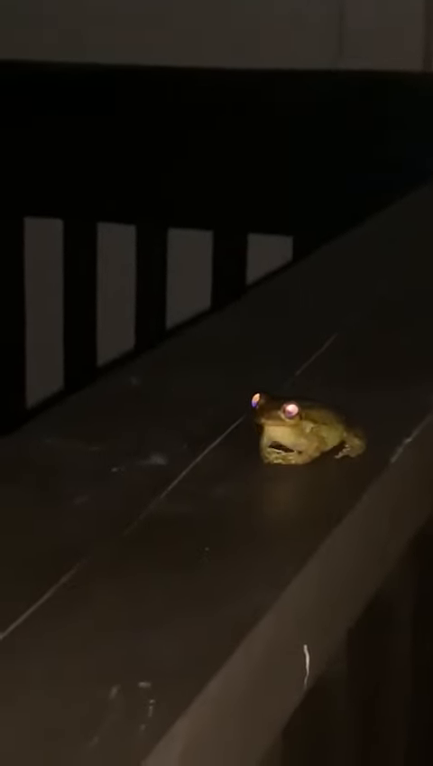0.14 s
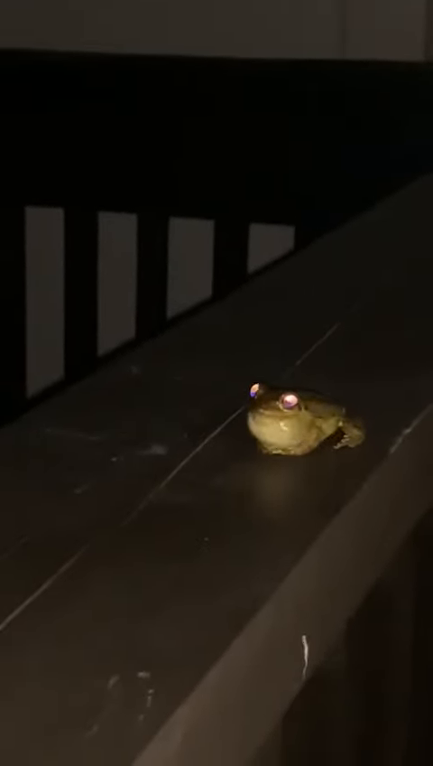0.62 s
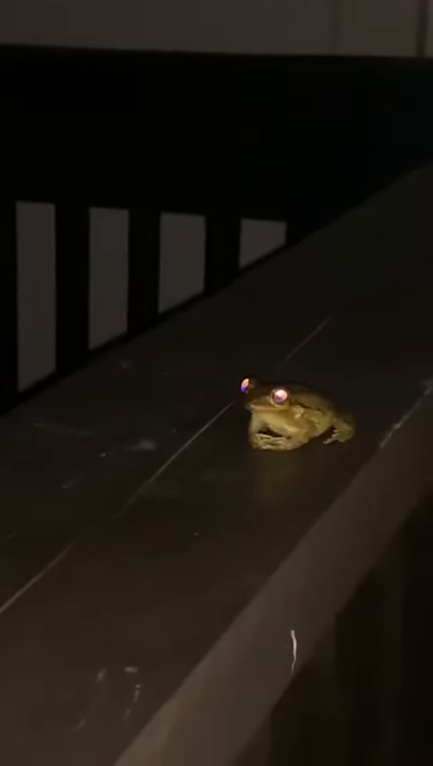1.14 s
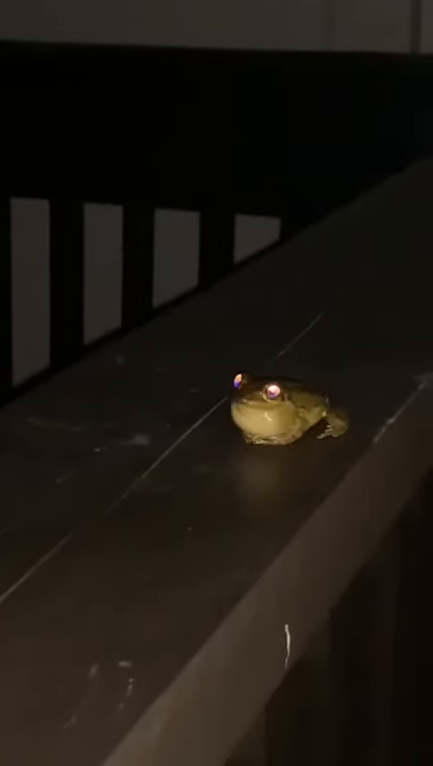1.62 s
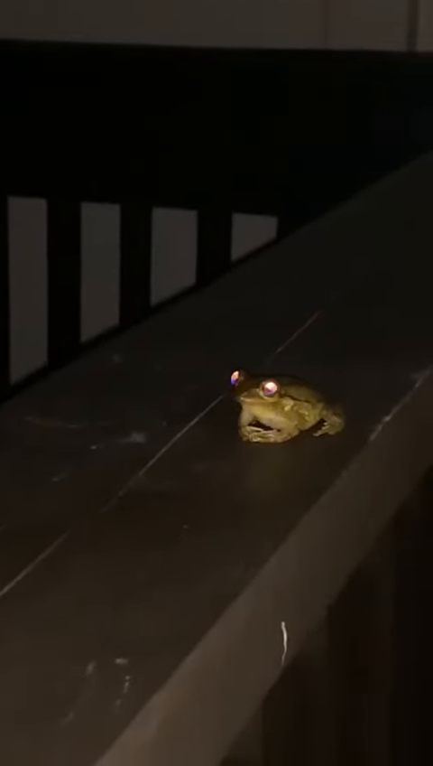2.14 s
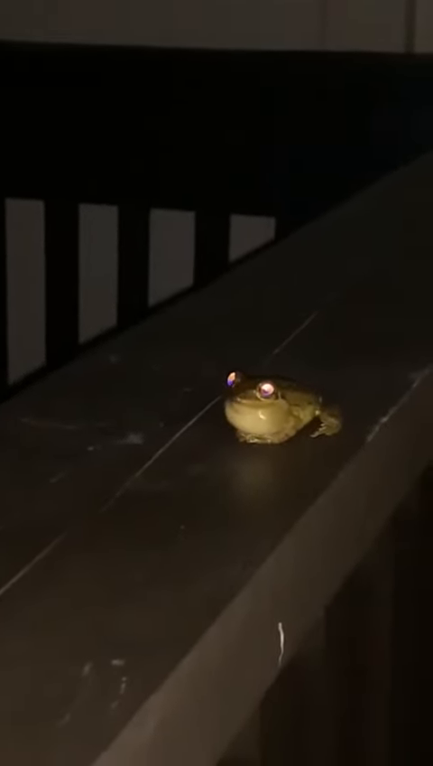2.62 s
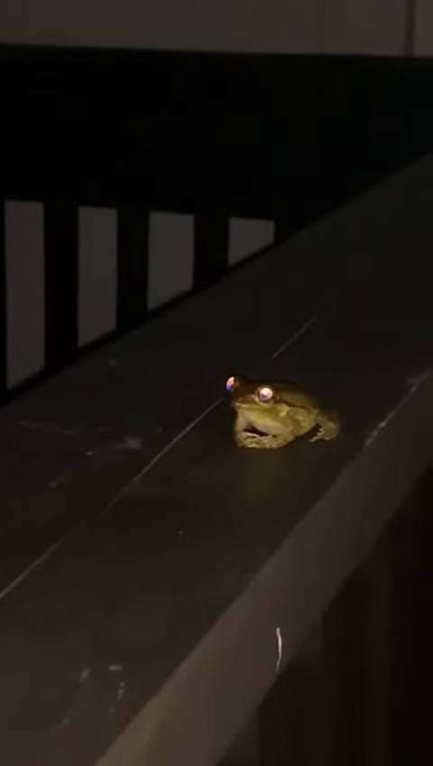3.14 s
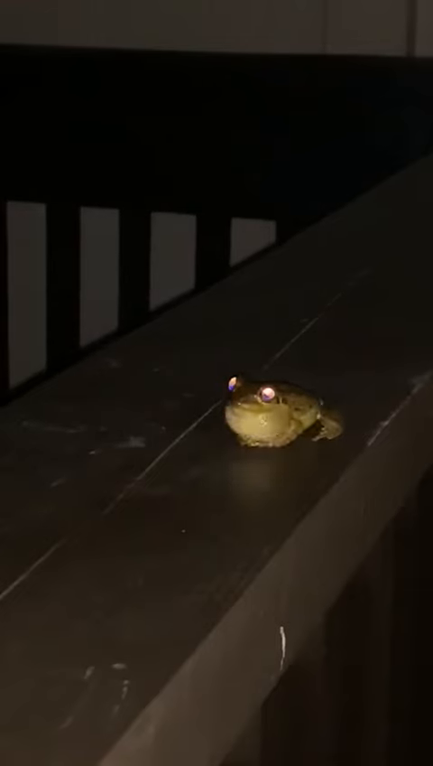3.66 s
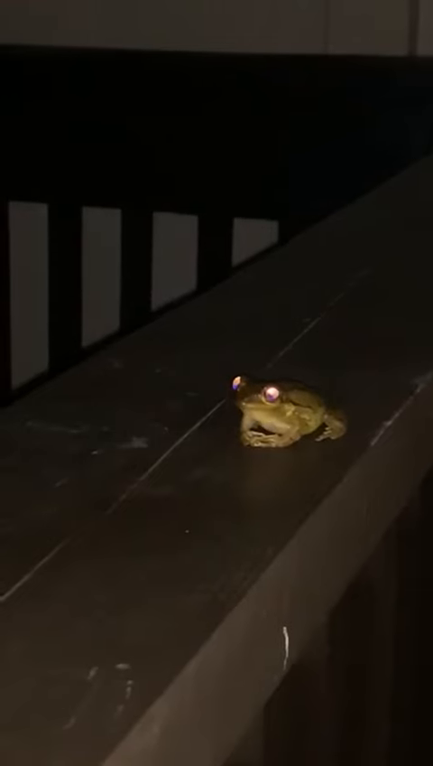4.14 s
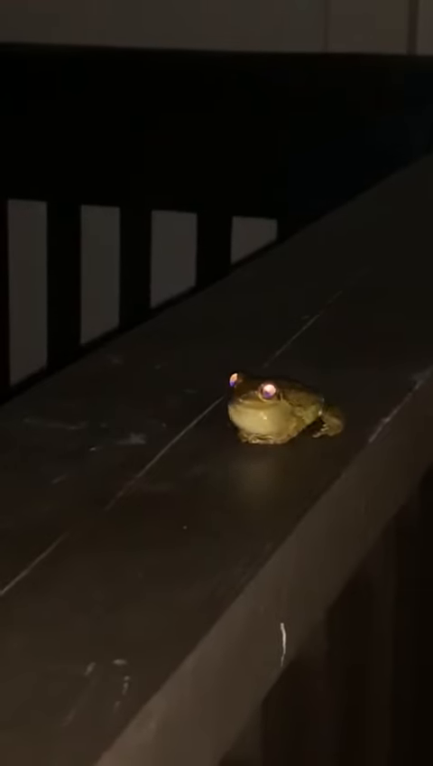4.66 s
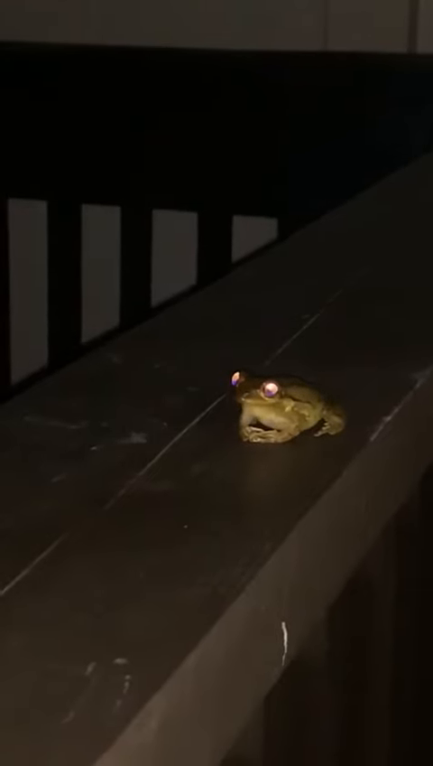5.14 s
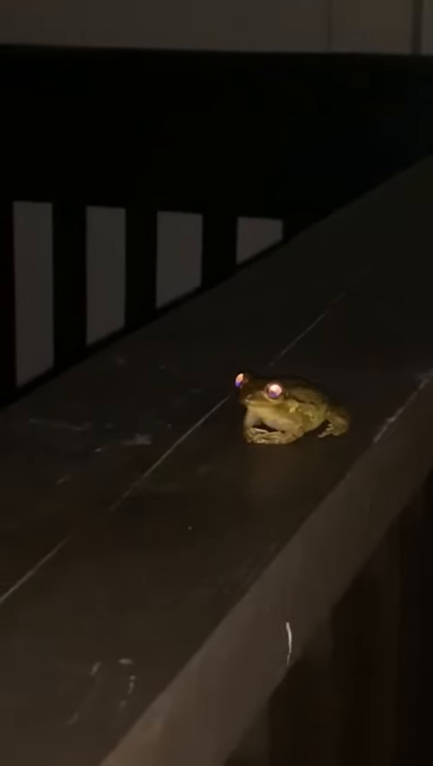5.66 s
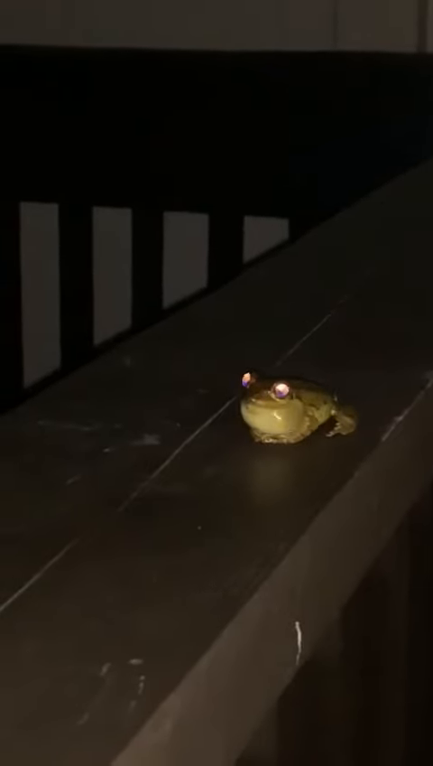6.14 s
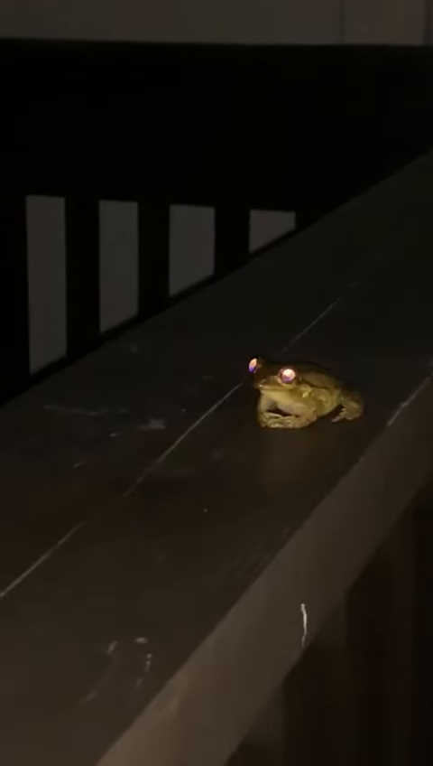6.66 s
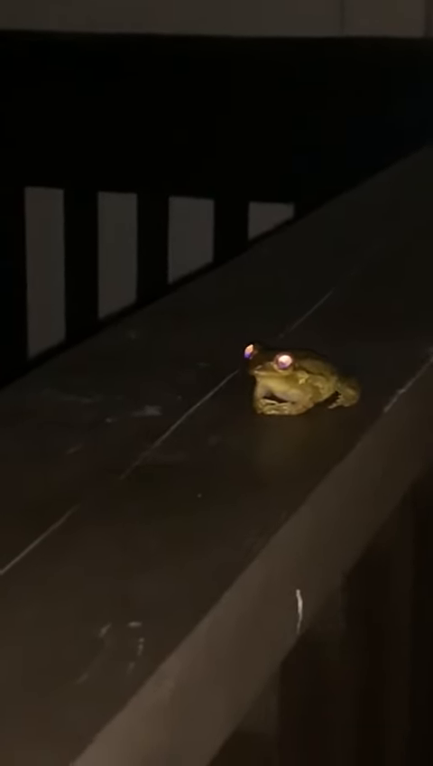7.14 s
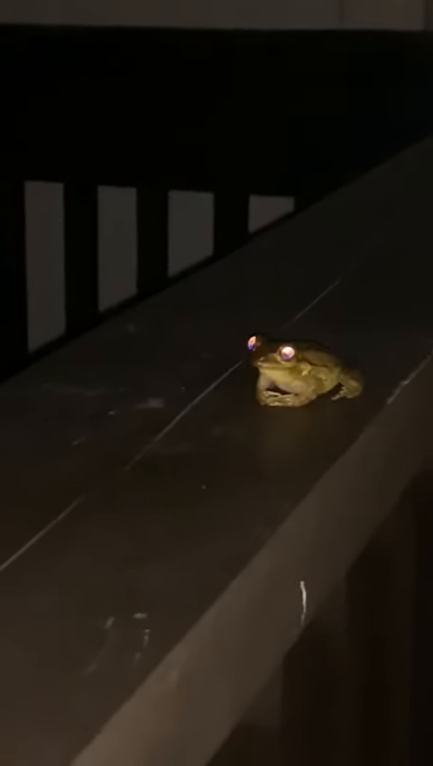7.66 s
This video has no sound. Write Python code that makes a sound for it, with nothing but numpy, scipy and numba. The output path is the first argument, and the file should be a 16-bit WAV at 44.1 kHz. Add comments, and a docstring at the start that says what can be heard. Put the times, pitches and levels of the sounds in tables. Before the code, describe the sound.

A close, loud frog croaks on a wooden porch rail: raspy, nasal, hollow clicks packed into a rising trill, then chopped into small groups, ending abruptly. Six full calls come after a clipped opening fragment, the later ones spaced wider. Behind, much quieter, are a thin steady cricket shimmer, wavering machine hum, night air and small low wind bumps on the phone, left alone at the end.

```python
"""Tree frog on a wooden rail at night

A small tree frog calls an arm's length from a phone: the end of one croak, then six whole ones.
Each croak is a swelling roll of throat clicks that breaks into short bursts, mostly of two to four.
Every click is an impulse that rings resonances of the vocal sac and its skin; the porch echoes it.
Behind it are filtered noises: a cricket chorus, the hum of distant machinery, night air and
a little wind on the microphones."""
import sys
import numpy as np
from scipy import signal
from scipy.fft import rfft, irfft, next_fast_len
from scipy.io import wavfile
from scipy.ndimage import uniform_filter1d
from numba import njit

SR = 44100
rng = np.random.default_rng(int(sys.argv[2]) if len(sys.argv) > 2 else 0)


def bounce(signal):
    """Save signal as a 16-bit WAV file at the path given by the first command-line argument."""
    frames = np.transpose(np.atleast_2d(signal))
    limited = np.clip(frames, -1, 1)
    pcm = np.round(limited * 32767).astype(np.int16)
    wavfile.write(sys.argv[1], SR, pcm)


def volts_from_db(level):
    """Convert decibel levels to linear amplitude ratios."""
    exponent = np.asarray(level, float) / 20
    return 10 ** exponent


N = 343539
# a run-up of at least 0.1 s lets resonances and echoes settle before time zero
LEAD = next_fast_len(N + 4410) - N
T = (np.arange(N + LEAD) - LEAD) / SR


def unit(x):
    """Normalisation: scales a signal to rms 1."""
    return x / np.sqrt(np.mean(x ** 2))


@njit
def svf(x, hz, width):
    """Second-order resonance with a moving centre, as a state-variable filter: (low-pass, band-pass)."""
    low, band, b, l = np.empty(len(x)), np.empty(len(x)), 0., 0.
    for i in range(len(x)):
        g, k = np.tan(np.pi * hz[i] / SR), width / hz[i]
        v = (b + g * (x[i] + 1e-18 - l)) / (1 + g * (g + k))
        low[i], band[i] = l + g * v, k * v
        b, l = 2 * v - b, 2 * low[i] - l
    return low, band


def narrow(hz, width):
    """Band-limited noise: a steady band of the given width [Hz] with steep edges, rms 1."""
    band = signal.butter(2, [hz - width / 2, hz + width / 2], "band", fs=SR, output="sos")
    return unit(signal.sosfilt(band, rng.standard_normal(len(T))))


def walk(rate):
    """Slow random modulation, rms 1: levels held for 1 / rate [s], then slewed twice."""
    k = int(SR / rate)
    held = rng.standard_normal(1000)[np.arange(len(T)) // k]
    return unit(uniform_filter1d(uniform_filter1d(held, k), k))


def ports(x, lag):
    """Arrival-time difference: the right port hears lag [samples] later, by a linear phase turn."""
    turn = np.exp(-2j * np.pi * np.arange(len(x) // 2 + 1) / len(x) * lag)
    return np.array([x, irfft(rfft(x) * turn, len(x))])


def air():
    """Night air as coloured noise whose coherence between the ports depends on frequency."""
    # shape of the night noise, (frequency [Hz], relative density [dB])
    air_colour = [(20, -25.5), (45, -13), (90, -11.5), (200, -16), (320, -19), (700, -26.5), (1200, -28),
                  (3000, -39), (4300, -41), (5100, -56), (6200, -39), (8200, -47), (10000, -46),
                  (11000, -58), (12000, -84.5)]
    # coherence, (frequency [Hz], share common to both ports [0..1])
    air_alike = [(60, 1), (130, 1), (260, .3), (600, 0.019), (2400, 0.15), (6000, 0.3)]
    level_db = -43.5  # rms over both ports
    colour_hz, colour_db = np.transpose(air_colour)
    alike_hz, alike_share = np.transpose(air_alike)
    log_hz = np.log(np.arange(len(T) // 2 + 1) * SR / len(T) + 1)
    colour = volts_from_db(np.interp(log_hz, np.log(colour_hz), colour_db))
    alike = np.clip(np.interp(log_hz, np.log(alike_hz), alike_share), 0, 1)
    mid, side = rfft(rng.standard_normal((2, len(T)))) * colour
    mid, side = mid * np.sqrt(1 + alike), side * np.sqrt(1 - alike)
    # the scene weights this noise once more, a little louder at the left port than the right
    return volts_from_db(level_db) * unit(irfft(np.array([mid + side, mid - side]), len(T)))


def machinery():
    """Distant machinery as narrow-band noise: a hum of four tones whose levels waver independently."""
    # hum tones, (centre [Hz], width [Hz], mean level apart from swells [dB])
    hum_tones = [(55, 14, -50), (122.3, 23, -50), (172, 21, -52.5), (236.6, 12, -57)]
    # swells of the second tone, (centre time [s], length [s], rise [dB])
    hum_swells = [(.3, 0.099, 5), (1.114, 0.2, 7.5), (2.23, 0.11, 2), (2.565, 0.16, 9)]
    swell_db = sum(db * np.exp(-((T - s) / (length / 2)) ** 2) for s, length, db in hum_swells)
    hum = 0
    for k, (hz, width, db) in enumerate(hum_tones):
        level_db = db + swell_db * (k == 1) + 1.5 * walk(3.3)
        hum = hum + volts_from_db(level_db) * narrow(hz, width)
    return hum


def wind():
    """Turbulence at the microphones: low rumble under gusts, nearly coherent between the ports."""
    # gusts, (time [s], rumble level before trim and flicker [dB])
    gust_levels = [(0.0, -37.5), (0.28, -34), (0.32, -46), (0.5, -33), (0.98, -52), (1.02, -40),
                   (1.06, -55), (1.15, -44), (3.62, -48), (3.66, -40.5), (3.93, -56), (3.99, -45.5),
                   (5.99, -46.5), (6.2, -49.5), (6.23, -34), (6.29, -54), (7.27, -45.5), (7.79, -52)]
    hz, width, trim_db = 52, 42, -2
    gust_s, gust_db = np.transpose(gust_levels)
    gust = volts_from_db(np.interp(T, gust_s, gust_db) + trim_db + 2.5 * walk(9))
    common = narrow(hz, width)
    opposed = .08 * np.array([[1], [-1]]) * narrow(hz, width)
    return gust * (common + opposed)


def crickets():
    """Diffuse chorus by superposition of modulated noise bands, in a mid and a side part."""
    # far singers, (centre [Hz], width [Hz], mean level in the mid part [dB])
    cricket_bands = [(7020, 260, -58), (7095, 50, -59.5), (7320, 150, -58.5), (7440, 50, -66.5),
                     (7690, 40, -73)]
    throb_db = 1.5 * walk(8.7)

    def chorus():
        """Amplitude-modulated bands: one throb shared by every chorus, a flicker for each band alone."""
        return sum(volts_from_db(db + throb_db + 2.5 * walk(25)) * narrow(hz, width) for hz, width, db in cricket_bands)

    return ports(chorus(), 12.3) + .5 * np.array([[1], [-1]]) * chorus()


def porch(x):
    """Reverberation by convolution: scattered echoes of rail and posts, fainter tail of walls and garden."""
    near_t60_s, near_db, far_t60_s, far_db = 0.063, -14.5, .35, -26
    t = np.arange(SR // 2) / SR
    noise = rng.standard_normal((3, len(t)))
    near = volts_from_db(-60 * t / near_t60_s) * (t > .002)
    far = volts_from_db(-60 * t / far_t60_s) * (t > .008)
    shape = volts_from_db(near_db) * near / np.linalg.norm(near) + volts_from_db(far_db) * far / np.linalg.norm(far)
    response = shape * (noise[0] + 0.84 * noise[1:])  # partly common to both ports
    # the boards of the rail favour a band 500 Hz wide around 2500 Hz
    x = 0.9 * x + svf(x, np.full(len(x), 2500.), 500.)[1]
    return signal.fftconvolve(x[None], response, axes=1)[:, :len(x)]


def roll(waver, start_s, steady_s, slow_s, last_s, steady_hz, slowed_hz):
    """Pulse train by rate integration: an uneven start, a fast swelling roll, then a slower, looser one."""
    start_hz = 235  # clicks per s before the waver
    sag_share, last_share = .97, .78  # of the steady top rate; of the slowed rate
    lead_s, slow_down_s, swell_s = .012, .016, 0.093
    start_db, lock_db, steady_db, full_db, swell_bend = -35, -25, -20.5, -1.4, 1.83
    start_jitter_s, slow_jitter_s = 0.00049, .00011
    on = (T >= start_s) & (T <= last_s)
    t, lock_s = T[on], steady_s - lead_s
    hz = np.interp(t, [start_s, lock_s, slow_s - lead_s, slow_s, slow_s + slow_down_s, last_s],
                   [start_hz, sag_share * steady_hz, steady_hz, sag_share * steady_hz,
                    slowed_hz, last_share * slowed_hz])
    count = np.cumsum(hz * waver[on]) / SR
    # whole counts back from the last click
    times = np.interp(count[-1] - np.arange(int(count[-1])), count, t)[::-1]
    to_go = np.clip(1 - (times - steady_s) / swell_s, 0, 1)
    swell_db = full_db + (steady_db - full_db) * to_go ** swell_bend
    onset_db = np.interp(times, [start_s, lock_s, steady_s], [start_db, lock_db, steady_db])
    db = np.where(times > steady_s, swell_db, onset_db)
    jitter_s = start_jitter_s * (times < lock_s) + slow_jitter_s * (times > slow_s)
    return list(zip(times, db, jitter_s))


def burst(first_s, count, gap_ms, later_ms, last_db):
    """Pulse group: strong first click, level bending late towards the last click's own, usually weaker."""
    first_db, bend = -1.5, 3  # the bend sets how late the level changes
    step = np.arange(round(count))
    times = first_s + (gap_ms * (step > 0) + later_ms * np.clip(step - 1, 0, None)) / 1000
    # a lone click takes the last level
    along = (step + (len(step) == 1)) / max(len(step) - 1, 1)
    return list(zip(times, first_db + (last_db - first_db) * along ** bend, 0 * times))


def ticks(own, scatter):
    """Weak periodic excitation: the folds keep ticking faintly in the pauses of one croak's bursts."""
    gap_s, jitter_s, level_db, scatter_db = .0055, .0008, -21.5, 3
    out = []
    for (from_s, _, _), (to_s, _, _) in zip(own, own[1:]):
        for s in np.arange(from_s + gap_s, to_s - gap_s / 2, gap_s):
            out.append((s, level_db + scatter_db * scatter[len(out)], jitter_s))
    return out


def croaks():
    """Excitation and slow state: clicks (s, dB, timing scatter s), sac fill and skin stretch (1 = fully)."""
    # opening rolls, (start [s], steady from [s], slows at [s], last click [s],
    # top steady rate [clicks/s], slowed rate [clicks/s])
    opening_rolls = [(.370, .4186, .4640, .5363, 422, 292), (1.341, 1.3854, 1.4313, 1.4987, 414, 285),
                     (2.310, 2.3512, 2.392, 2.4632, 395, 245), (3.272, 3.3271, 3.3666, 3.421, 405, 280),
                     (4.432, 4.4714, 4.510, 4.5893, 400, 255), (5.750, 5.803, 5.8356, 5.8867, 380, 282)]
    # bursts, (first click [s], clicks, first gap [ms], later gaps [ms], last click level [dB])
    click_bursts = [(-.022, 3, 3.5, 4, -11), (0.5433, 4, 9.5, 7, -0.5), (.5862, 1, 0, 0, -12.4),
                    (0.5938, 3, 5, 5, -4.5), (0.6259, 3, 7, 5.5, -4.5), (0.6635, 3, 7, 11.5, -8),
                    (0.7024, 3, 6, 9.5, -3.5), (0.7395, 3, 6.5, 5.5, -6), (0.7735, 2, 5, -1, -10.5),
                    (1.5042, 2, 7, 1, -2.3), (1.5265, 4, 8.5, 5, -1), (1.5693, 3, 6.5, 7.5, -3.5),
                    (1.6074, 3, 6.5, 10.5, -4), (1.6457, 2, 6.5, 0, -2.5), (1.681, 3, 7.5, 12.5, -3),
                    (1.72, 3, 6.5, 6.5, -3), (1.7478, 3, 5.0, 4.5, -13), (2.4767, 4, 6, 5.5, -4),
                    (2.5147, 3, 7, 5, -0.5), (2.543, 1, 0, 0, -12), (2.556, 3, 6.5, 5.5, -4.5),
                    (2.5956, 3, 7.5, 8.5, -5.5), (2.6372, 3, 7.5, 10, -5.5), (2.669, 1, 0, 0.5, -12.3),
                    (3.4267, 4, 7, 5, -2), (3.4476, 2, 7, 1, -2.5), (3.4733, 3, 6, 6.5, -1.5),
                    (3.5061, 3, 7, 10.5, -8.5), (3.545, 3, 6, 11, -7), (3.5816, 2, 6, -3, -2.5),
                    (3.6118, 3, 9, 6, -4.5), (3.655, 2, 7.5, 0, -3.5), (3.688, 4, 8, 6, -4),
                    (3.7122, 2, 2.5, 0, -7), (4.6027, 4, 11, 7.4, -4), (4.65, 3, 7, 10.5, -7.5),
                    (4.6861, 3, 6.5, 12, -6), (4.7256, 3, 6, 10, -6), (4.7647, 3, 7, 12, -2),
                    (4.8023, 3, 5.0, 4, -7.5), (5.8913, 4, 6.5, 7, -2.1), (5.924, 1, 0, -0.5, -2.5),
                    (5.9407, 3, 5.5, 4, -1.4), (5.9766, 3, 6, 9, -6), (6.0139, 3, 7.5, 7.7, -4),
                    (6.0515, 3, 7, 9.5, -7.5), (6.0915, 3, 6, 8.5, -5), (6.1316, 3, 7.5, 10.5, -7),
                    (6.164, 3, 4, 4.5, -18)]
    # clicks that flutter out after the last burst, (gap [ms], fall per click [dB])
    flutter_out = (2, 2.9)
    flutter_jitter_s, rate_waver = .0006, .03
    fill_wait_s, fill_s, stretch_s, empty_s, sag = 0.023, 0.051, .085, 0.0059, 1.8
    clicks, fill, stretch = [], np.zeros(len(T)), np.zeros(len(T))
    waver = 1 + rate_waver * walk(45)
    starts = [T[0] - 1] + [row[0] for row in opening_rolls] + [np.inf]
    # the first croak has no roll: only its end is heard
    for k, opening in enumerate([None] + list(opening_rolls)):
        own = [c for row in click_bursts if starts[k] < row[0] < starts[k + 1] for c in burst(*row)]
        end_s, end_db, _ = own[-1]
        own += ticks(own, rng.standard_normal(100))
        step = np.arange(1, 9)
        flutter_s = end_s + step * flutter_out[0] / 1000
        own += list(zip(flutter_s, end_db - step * flutter_out[1], flutter_jitter_s + 0 * step))
        if opening:
            own += roll(waver, *opening)
        # the sac fills exponentially and sags past its slack state as the croak ends
        begin = opening[1] + fill_wait_s if opening else starts[0]
        now = (T > starts[k]) & (T <= starts[k + 1])
        since = np.clip(T[now] - begin, 0, None)
        spent = (1 + np.tanh((T[now] - end_s) / empty_s)) / 2
        fill[now] = 1 - np.exp(-since / fill_s) - sag * spent
        stretch[now] = 1 - np.exp(-since / stretch_s)
        clicks += own
    return np.array(clicks), fill, stretch


def strikes(times, sizes):
    """Band-limited impulses: windowed sincs centred on exact moments between samples."""
    place = times * SR + LEAD
    taps = np.floor(place)[:, None].astype(int) + np.arange(-7, 9)
    away = taps - place[:, None]
    out = np.zeros(len(T))
    np.add.at(out, taps, sizes[:, None] * np.sinc(away) * np.cos(np.pi * away / 16) ** 2)
    return out


def frog():
    """Source and filter: fold snaps ring throat and sac in series and skin modes in parallel."""
    # throat and sac in series, (centre slack [Hz], centre inflated [Hz], width [Hz])
    sac_modes = [(1143, 1226, 340), (1560, 1857, 460), (1831, 2310, 222), (2250, 2567, 480)]
    # skin modes side by side, (centre slack [Hz], centre stretched [Hz], width of each of two passes [Hz],
    # level re the main resonance [dB])
    skin_modes = [(2950, 3050, 690, -26), (3420, 3400, 460, -18.5), (3800, 3793, 450, -25),
                  (4400, 4400, 500, -36), (5300, 5200, 900, -46), (6540, 6200, 400, -34),
                  (8200, 7600, 430, -23.5), (9900, 8050, 600, -30), (10300, 8500, 550, -30.5),
                  (10800, 10800, 500, -55.5)]
    sac_low_hz, click_db, rise_s = 893, 0.67, .0011  # click_db: peak of a 0 dB click, sac inflated
    rasp_s, rasp, slack_skin_db, treble_hz = .003, .35, -14, 5800
    waver, tremble = 1 + 0.0095 * walk(60), 1 + .012 * walk(90)
    hiss = rng.standard_normal(len(T))
    clicks, fill, stretch = croaks()
    chance = rng.standard_normal((900, 3))[:len(clicks)].T
    # strike early by the time the ring takes to rise
    times = clicks[:, 0] - rise_s + clicks[:, 2] * chance[2]
    db = clicks[:, 1]
    # a small sac radiates the change of flow, and little bass
    high = signal.butter(6, sac_low_hz, "high", fs=SR, output="sos")
    body = signal.sosfilt(high, np.gradient(strikes(times, volts_from_db(db + .6 * chance[0]))))
    # the probe is one click through the inflated sac, for scaling
    probe = signal.sosfilt(high, np.gradient(signal.unit_impulse(1024, 8)))
    for slack_hz, full_hz, width in sac_modes:
        centre = (slack_hz + (full_hz - slack_hz) * fill) * waver
        body = svf(body, centre, float(width))[0]
        probe = svf(probe, np.full(len(probe), float(full_hz)), float(width))[0]
    # the skin's drive grows faster than the click: hard snaps sound brighter
    hard = strikes(times + .0004, volts_from_db(1.26 * db + 2.0 * chance[1])) * np.abs(rfft(probe)).max()
    # a short spurt of air follows each snap and roughens the skin's ring
    fade = np.exp(-1 / (rasp_s * SR))
    spurt = signal.lfilter([1], [1, -fade], hard)
    hard = hard + rasp * np.sqrt(1 - fade ** 2) * hiss * spurt
    # slack skin hardly rings
    hard = hard * volts_from_db(slack_skin_db * (1 - stretch))
    skin = 0
    for k, (slack_hz, full_hz, width, mode_db) in enumerate(skin_modes):
        centre = (slack_hz + (full_hz - slack_hz) * stretch) * tremble
        once = svf(hard, centre, float(width))[1]
        twice = svf(once, centre, float(width))[1]
        ring = (-1) ** k * volts_from_db(mode_db) * twice  # neighbouring modes alternate in sign
        skin = skin + ring * np.array([[full_hz < treble_hz], [full_hz >= treble_hz]])
    gain = volts_from_db(click_db) / np.abs(probe).max()
    return gain * (body + skin[0]), gain * skin[1]


def scene():
    """Superposition: the frog and its echoes over the night background."""
    night = air() * volts_from_db([[.6], [-.6]]) + machinery() + wind() + crickets()  # air 1.2 dB louder at left
    voice, treble = frog()
    # the treble takes the longer way round the phone to the right port
    direct = ports(voice, 2) + ports(treble, 5.5)
    echoes = porch(voice + 2.2 * treble)
    return (direct + echoes + night)[:, LEAD:]


def top_cut(x):
    """Nothing passes above the cut-off."""
    return signal.sosfilt(signal.butter(12, 11200, fs=SR, output="sos"), x)


def record(dry):
    """Saturation: the phone clips the very loudest clicks at full scale."""
    mix = np.clip(dry, -1, 1)
    return top_cut(mix)


dry = scene()
out = record(dry)
bounce(out)
```